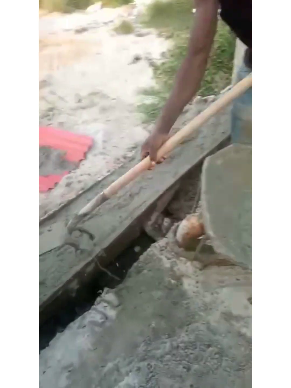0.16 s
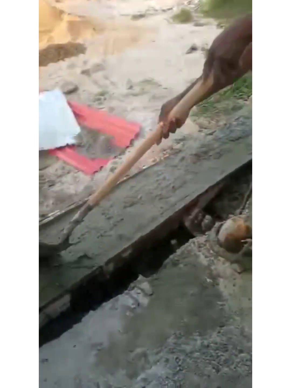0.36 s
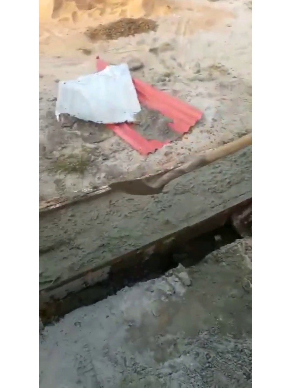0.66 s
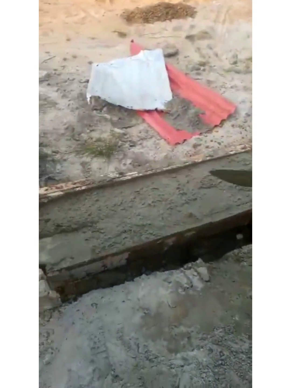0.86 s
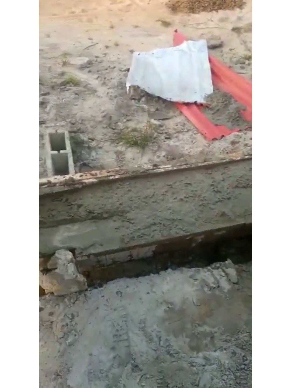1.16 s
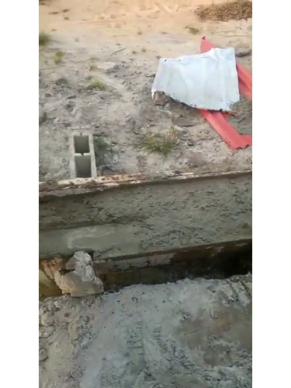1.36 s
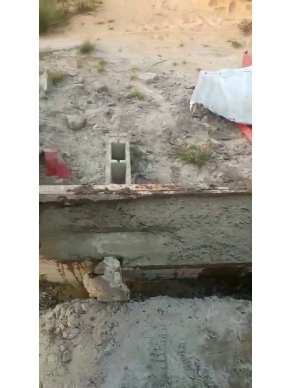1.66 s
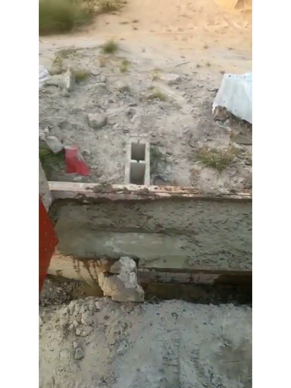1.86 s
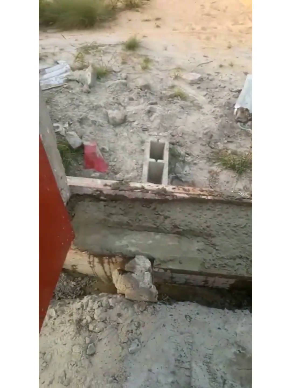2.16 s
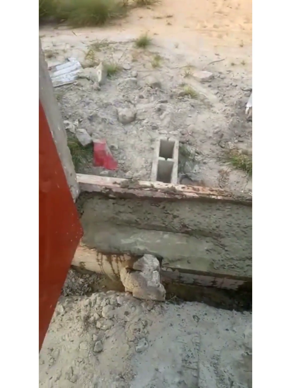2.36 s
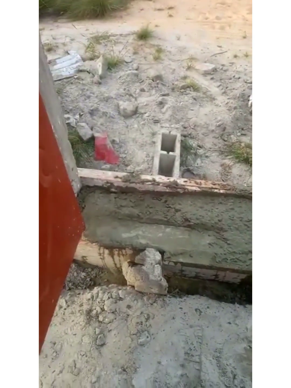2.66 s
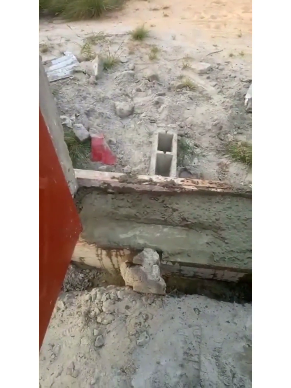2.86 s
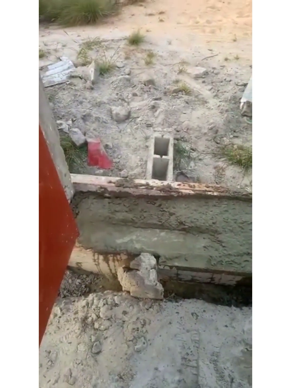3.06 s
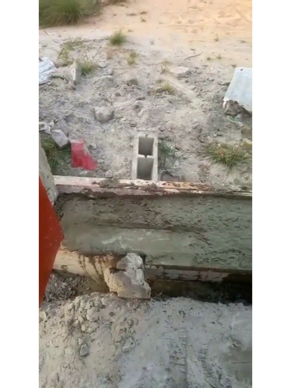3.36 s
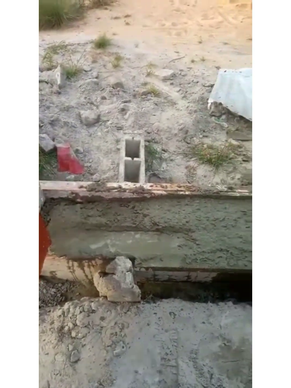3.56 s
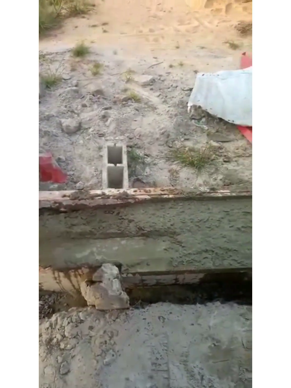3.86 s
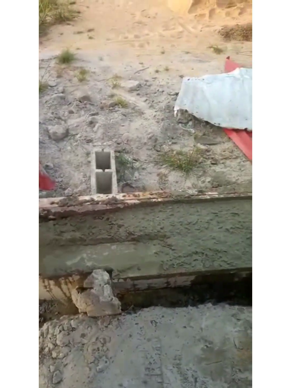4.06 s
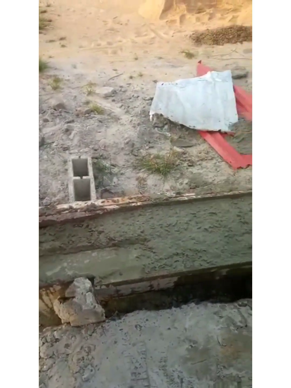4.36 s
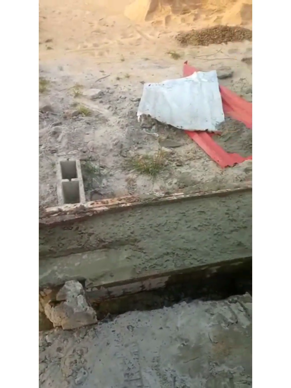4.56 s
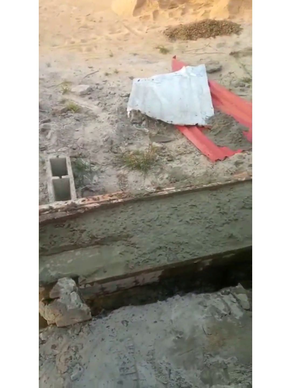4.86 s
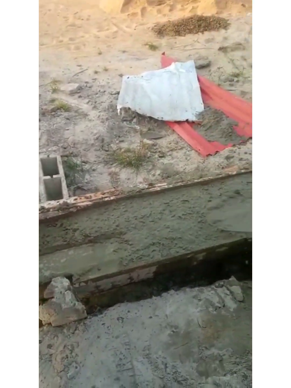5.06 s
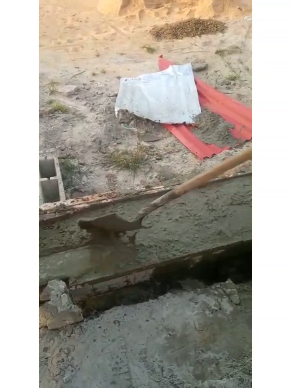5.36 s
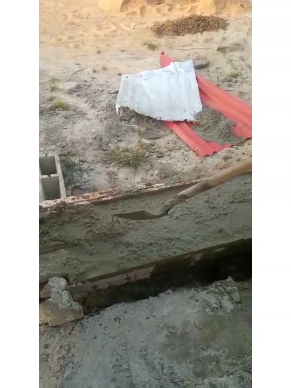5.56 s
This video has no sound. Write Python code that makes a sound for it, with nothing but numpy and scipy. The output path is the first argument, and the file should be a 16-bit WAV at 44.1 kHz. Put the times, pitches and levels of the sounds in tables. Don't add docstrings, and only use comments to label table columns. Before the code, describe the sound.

A short, crisp crush of wet grit on a slab fades to tiny ticks and soft hiss. Then a coarse, hollow metal scrape catches and slips in a wheelbarrow, followed by duller sliding, loose gravel and scattered stones. Near the end the shovel spreads concrete again. Open, dry building site, single phone microphone, faint wind buffeting.

```python
import sys
import numpy as np
from scipy import signal
from scipy.fft import rfft, irfft
from scipy.io import wavfile
from scipy.ndimage import uniform_filter1d, map_coordinates

SR = 44100
rng = np.random.default_rng(int(sys.argv[2]) if len(sys.argv) > 2 else 0)


def ratio_of_db(decibels):
    return 10 ** (np.asarray(decibels, float) / 20)


def store_wav(level_fs):
    pcm = np.round(np.clip(np.atleast_2d(level_fs), -1, 1) * 32767)
    wavfile.write(sys.argv[1], SR, pcm.T.astype(np.int16))


N = 252030

EDGES_HZ = (600, 2500, 8300)
# (frequency [Hz], density [dB per Hz])
WET_SPECTRUM = [(88, -69.5), (150, -18), (343, -6.5), (460, -12), (814, -2), (1210, -2.5), (1620, -5),
                (1860, -2.5), (2500, -6), (6550, -3), (9100, -25.5), (13300, -29.5), (15300, -17.5),
                (16500, -32)]
# (time [s], peak [dB], load [dB], t60 [s])
LUMPS = [(0.6543, -30, -9, 0.14), (0.8877, -55, -33, .035), (1.052, -37.5, -4.5, 0.28),
         (1.223, -50, -5, 0.072), (1.305, -50, -37.5, 0.076), (1.8527, -48, 2.5, 0.31),
         (1.908, -49.5, 1, 0.085), (4.6565, -34, -7, 0.094), (3.6503, -55, 17, 0.027),
         (3.696, -36, -5.5, 0.045), (3.9656, -41.5, -2, 0.08), (4.0, -68, 5, 0.11), (4.07, -59, 6.5, 0.1),
         (4.1331, -43, -9, 0.1), (4.3063, -38.5, 6.5, 0.039), (4.463, -53, 9, 0.11),
         (4.6932, -52, 9.5, 0.14)]


def along(points, hz):
    point_hz, values = np.transpose(points)
    return np.interp(np.log(hz + 1), np.log(point_hz + 1), values)


def curves(rows, fade_s=0.042):
    time_s, *columns = np.transpose(rows)
    t = np.arange(N) / SR
    corners_s = [time_s[0] - fade_s, time_s[0], time_s[-1], time_s[-1] + fade_s]
    gate_db = np.interp(t, corners_s, [-70, 0, 0, -70])
    return [np.interp(t, time_s, column) for column in columns], gate_db


def wobble(rate_hz):
    knots = rng.standard_normal(int(N * rate_hz / SR) + 4)
    return map_coordinates(knots, [np.arange(N) * rate_hz / SR])


def coloured(x, gain):
    size = 2 ** 13
    cepstrum = irfft(np.log(gain(np.fft.rfftfreq(size, 1 / SR)) + 1e-6))
    cepstrum[1:size // 2] *= 2
    cepstrum[size // 2 + 1:] = 0
    kernel = irfft(np.exp(rfft(cepstrum)))[:size // 2]
    return signal.fftconvolve(x, kernel / np.linalg.norm(kernel))[:N]


def sounded(forces, gain):
    def below(hz, edge_hz):
        return 1 / (1 + (hz / edge_hz) ** (6 + edge_hz / 500))

    low_hz, mid_hz, high_hz = EDGES_HZ
    parts = [lambda hz: below(hz, high_hz) - below(hz, mid_hz),
             lambda hz: below(hz, low_hz),
             lambda hz: below(hz, mid_hz) - below(hz, low_hz),
             lambda hz: 1 - below(hz, high_hz)]
    out = np.zeros(N)
    for force, part in zip(forces, parts):
        out += coloured(force, lambda hz: gain(hz) * np.sqrt(np.abs(part(hz))))
    return out


def grit(rate_hz, spread_db, life_s, smooth_db, lumps_db):
    sizes = np.minimum(rng.exponential(size=N), 3.5)
    starts = (rng.random(N) < rate_hz / SR) * ratio_of_db(2 * spread_db * sizes)
    grains = signal.lfilter([1], [1, -np.exp(-1 / (life_s * SR))], starts)
    power = grains / grains.mean() + ratio_of_db(2 * smooth_db)
    noise = rng.standard_normal((len(EDGES_HZ) + 1, N))
    force = np.sqrt(power) * ratio_of_db(lumps_db * wobble(80)) * noise
    return force / force.std()


def shared(effort_db, load_db, rule):
    thud_db, thud_per_load, fizz_db, fizz_per_effort, fizz_per_load = rule
    thud = effort_db + thud_db + thud_per_load * load_db
    rasp = effort_db + load_db
    fizz = fizz_db - 45 + fizz_per_effort * (effort_db + 45) + fizz_per_load * load_db
    return np.array([effort_db, thud, rasp, fizz])


def stroke(rows, rule, fade_s=0.2):
    controls, gate_db = curves(rows, fade_s)
    return ratio_of_db(2 * (shared(*controls, rule) + gate_db))


def swells(rows, trim_db, rule, rise_s):
    t = np.arange(SR // 3) / SR
    push = np.zeros((4, N + SR))
    for time_s, peak_db, load_db, t60_s in rows:
        rise = rise_s + 0.016 * t60_s
        swell = (1 - np.exp(-t / rise)) ** 2 * ratio_of_db(-120 * t / t60_s)
        power = ratio_of_db(2 * shared(peak_db + trim_db, load_db, rule))[:, None]
        push[:, round(time_s * SR):][:, :len(t)] += power * swell / swell.max()
    return push[:, :N]


def ringing(modes, floor, order=2):
    tops = [(mode_hz, db) for mode_hz, _, db in modes]

    def gain(hz):
        peaks = 0
        for mode_hz, width_hz, db in modes:
            response = hz * width_hz / (mode_hz ** 2 - hz ** 2 + 1j * hz * width_hz)
            peaks = peaks + ratio_of_db(db) * np.abs(response) ** order
        return floor + peaks / ratio_of_db(along(tops, hz))
    return gain


def patchy(x, depth_db, bins, frames):
    z = signal.stft(x, nperseg=512)[2]
    field = uniform_filter1d(rng.standard_normal(z.shape), bins, 0)
    field = uniform_filter1d(field, frames, 1)
    level_db = 10 * np.log10(np.sum(np.abs(z) ** 2, 0) + 1e-12)
    depth = depth_db * np.clip((-25.5 - level_db) / 30, 0.3, 1)
    gain = ratio_of_db(depth * field / field.std() - 0.115 * depth ** 2)
    return signal.istft(z * gain, nperseg=512)[1][:N]


def spreading():
    # (time [s], effort [dB], load [dB])
    strokes = [
        [(0.0, -52, 6.5), (0.06, -68.5, 4.5), (0.24, -61, -4.5)],
        [(0.25, -57, -10), (0.36, -54, -13), (0.395, -44, -3), (0.426, -33.5, -10.5), (0.57, -28.5, -4),
         (0.61, -40.5, -5.5), (0.71, -48.5, -2), (0.858, -62.5, -4.5), (0.9, -54, -20)],
        [(5.118, -73.5, 1), (5.256, -58, 0), (5.348, -53.5, -7), (5.41, -42, -4.5), (5.49, -27, -6.5),
         (5.588, -31.5, -2.5), (5.686, -50, -4), (5.715, -50.5, -3)],
    ]
    # (time [s], effort [dB], load [dB])
    settle = [(0.92, -62, -19.5), (1.036, -61.5, -14), (1.112, -71, 10.5), (1.17, -69.5, -1),
              (1.24, -67.5, -16.5), (1.4, -76.5, -16), (1.58, -84.5, -25.5), (1.836, -75, 0.5),
              (2.102, -85.5, 12)]
    # (frequency [Hz], gain [dB])
    thin_layer = [(1200, -2), (3000, -3.5), (6000, 0), (11000, -3.5)]
    site_db = [
        [-86.5],
        [-81],
        [-83.5],
        [-95],
    ]
    heaping = (3.4, 1.17, -20.5, 1.2, 1.5)
    on_slab = (-7.5, 2.5, -12, 0.7436, 0)
    settling = (-8, 1, -13, 1.4, -0.5)
    slumping = (-15.5, 6.5, -16.5, 1, -0.6)

    push = stroke(strokes[0], heaping) + stroke(strokes[1], on_slab) + stroke(strokes[2], on_slab)
    rest = stroke(settle, settling) + swells(LUMPS[:8], -16, slumping, rise_s=0.0011)
    rest += ratio_of_db(2 * np.array(site_db))
    force = grit(600, spread_db=1.0, life_s=0.00056, smooth_db=0.5, lumps_db=0.6)
    pushed = sounded(np.sqrt(push) * force, lambda hz: ratio_of_db(along(WET_SPECTRUM, hz)))
    settled = sounded(np.sqrt(rest) * force[:, ::-1],
                      lambda hz: ratio_of_db(along(WET_SPECTRUM, hz) + along(thin_layer, hz)))
    return patchy(pushed + settled, 3.6, bins=2, frames=8)


def wind():
    # (time [s], strength [dB])
    gust_levels = [(0.0, -57), (0.83, -64.5), (1.06, -57.5), (1.72, -67), (1.91, -59), (2.07, -56),
                   (2.4, -60), (2.77, -51.5), (3.15, -57.5), (3.62, -58), (4.18, -62), (4.42, -66),
                   (4.6, -55.5), (5.06, -64), (5.3, -62), (5.5, -55), (5.6, -54.5), (5.71, -64)]
    # (frequency [Hz], density [dB per Hz])
    rumble_spectrum = [(15, -64), (25, -27), (65, -9.5), (86, -5.5), (168, -10), (227, -28.5), (300, -40.5),
                       (390, -66), (660, -120)]
    lumps_db = 2.5 * wobble(7) + 1.5 * wobble(18)
    gusts = ratio_of_db(curves(gust_levels)[0][0] + lumps_db)
    rumble = coloured(rng.standard_normal(N), lambda hz: ratio_of_db(along(rumble_spectrum, hz)))
    return patchy(gusts * rumble, 4, bins=1, frames=14)


def landings(rows, spectrum, rule):
    t = np.arange(SR // 8) / SR
    forces, rings = np.zeros((4, N + SR)), np.zeros(N + SR)
    lasts = np.array([[1], [1.8], [1.3], [1.15]])
    rise_s = np.array([[0.0002], [0.003], [0.001], [0.0002]])
    crack_share = [[1], [0], [0.5], [1]]
    blow_share = np.array([0.46, 0.26, 0.45, 1])
    for time_s, peak_db, weight_db, stone_hz, sharp_db in rows:
        at, draw = round(time_s * SR), rng.standard_normal((5, len(t)))
        t60_s = max(0.061 + 0.00075 * weight_db, 0.02)
        splash = (1 - np.exp(-t / rise_s)) * ratio_of_db(-60 * t / (t60_s * lasts)) * draw[:4]
        splash += 2.05 * ratio_of_db(-60 * t / 0.0065) * draw[:4] * crack_share
        splash[:, 0] += 9 * np.sign(draw[4, 4]) * blow_share
        levels_db = shared(peak_db - 19.0, weight_db + 2.0, rule) + [0, 0, 0, sharp_db]
        forces[:, at:at + len(t)] += ratio_of_db(levels_db)[:, None] * splash

        pitches_hz = stone_hz * np.exp(np.array([0, 0.3]) * draw[4, 1:3])[:, None]
        tones = np.sin(2 * np.pi * np.minimum(pitches_hz, 7200) * t)
        rings[at:at + len(t)] += ratio_of_db(peak_db - 13.0 - 60 * t / (0.7 * t60_s)) * (tones.T @ [0.8, 0.3])
    return sounded(forces[:, :N], lambda hz: ratio_of_db(along(spectrum, hz))) + rings[:N]


def falling_stones():
    # (time [s], peak [dB], weight [dB], stone [Hz])
    crumb_rows = [(0.134, -35.5, -13, 1780), (0.1815, -43, -10, 6750), (0.2663, -33.5, -18, 6400),
                  (0.301, -34.5, -13, 796), (0.4256, -23, 10, 1510), (0.4775, -13, -0.5, 5840),
                  (0.5172, -19, 8, 2930), (0.5418, -18.5, 0, 7200), (0.5902, -18, 1.5, 874),
                  (0.664, -25.5, -6, 6650), (0.7169, -22, -5.5, 2950), (0.7494, -32.5, -3.5, 6100),
                  (0.7881, -39, -5.5, 5380), (0.775, -51, -25, 6250), (0.864, -42, -23, 6890),
                  (0.888, -50, -22, 3170), (0.964, -38, -25, 6530), (1.356, -53, -25, 6340),
                  (1.383, -55, -30.5, 7330), (1.457, -58, -18.5, 6460), (1.596, -53.5, -36.5, 5400),
                  (5.1167, -47, -8, 7030), (5.1692, -36.5, -56, 6400), (5.216, -36, -4, 6500),
                  (5.243, -41, -30, 780), (5.374, -26, 0.5, 6330), (5.4806, -19.5, 2.5, 6180),
                  (5.506, -11, -15, 6480), (5.5435, -12.5, -12, 4460), (5.4365, -23, -18, 6660),
                  (5.517, -11, -15, 4160), (5.6003, -17, -22, 6050), (5.6607, -26, -3, 4160)]
    # (time [s], peak [dB])
    sparks = [(0.429, -30.5), (0.471, -26.5), (0.6637, -31.5), (4.481, -54), (4.661, -37), (4.799, -53),
              (4.8365, -57), (4.896, -53.5), (4.952, -54), (4.966, -56.5), (4.976, -54.5), (5.027, -72),
              (5.046, -60), (5.054, -50.5), (5.123, -43), (5.424, -30.5), (5.648, -33)]
    # (time [s], peak [dB], weight [dB])
    ticks = [(3.061, -31, -19), (3.2539, -33.5, 3), (3.3137, -39, -20), (3.814, -47, -25),
             (3.197, -42, -13), (3.469, -41, -25), (2.557, -20.5, -3), (2.745, -24.5, -5),
             (4.005, -47, -35), (4.021, -48, -29), (4.141, -31.5, -4.5), (4.389, -40.5, -8),
             (4.446, -44, -28), (4.475, -38, -8), (4.492, -47, -17.5), (5.405, -29.5, -31),
             (5.1525, -46, -16), (5.2965, -36.5, -7), (5.693, -29, -25), (5.698, -28.5, -13),
             (5.1893, -43, -18)]
    # (time [s], peak [dB], weight [dB], stone [Hz], sharpness [dB])
    first_run = [(3.1898, -29, 1, 1890, -40), (3.3453, -32, -3, 3300, -24), (3.436, -34, -10, 4060, -44),
                 (3.475, -35.5, -27, 1850, -46.5), (3.5231, -23, 2.5, 4800, -42),
                 (3.5241, -20, 2.5, 3670, -53), (3.5894, -19.5, -1, 1696, -32),
                 (3.6217, -36, -24, 4670, -20), (3.7366, -29, -10.5, 1860, -22),
                 (3.783, -26.5, -12.5, 3320, -34), (3.8387, -38, -3.5, 4560, -36),
                 (3.8736, -44, -28, 4470, -12), (3.9424, -42, -4, 5600, -30),
                 (3.9545, -41.5, -10, 3650, -32)]
    # (time [s], peak [dB], weight [dB], stone [Hz], sharpness [dB])
    second_run = [(4.045, -43, -24, 5800, -24), (4.0807, -43, -27, 4660, -26),
                  (4.2502, -23, -14, 3540, -28.5), (4.2848, -23.5, -4.5, 3800, -25),
                  (4.324, -29.5, -8.5, 4630, -21), (4.361, -21.5, -32, 5720, -26),
                  (4.4532, -28.5, -17, 2000, -25), (4.481, -39.5, -2, 4740, -16.5),
                  (4.503, -29.5, -24, 4530, -25), (4.5138, -19.5, -9.5, 3240, -27),
                  (4.518, -18.5, -20, 4820, -40), (4.5502, -38, -3, 5000, -15),
                  (4.578, -31, -43, 5330, -16), (4.74, -49, -18, 4130, -25),
                  (4.855, -49, -30.5, 5040, -26.5)]
    # (time [s], effort [dB], load [dB])
    trickle = [(3.5, -62.5, -1), (3.6, -60, -1), (3.9, -69.5, -10), (4.08, -70, 0), (4.31, -70.5, -9),
               (4.55, -71.5, 3.5), (4.75, -79, -8), (5.1, -78, 3.5)]
    # (frequency [Hz], density [dB per Hz])
    gravel_spectrum = [(88, -27.5), (150, -10), (281, -6), (386, 1), (656, -6), (1310, -11.5), (1790, -6.5),
                       (2500, -15), (4690, -7), (6420, -6.5), (7510, -10), (8620, -27.5), (13000, -38),
                       (15300, -25.5), (16500, -35.5)]
    # (frequency [Hz], width [Hz], gain [dB])
    hollow_modes = [(373.6, 26, -3.5), (599, 20, -14), (791, 56, -8), (1090, 45, -13), (1750, 200, -8),
                    (3200, 170, -18), (3660, 92, -10), (4970, 890, -5.5)]
    loose = (-0.5, 1, -15.5, 1, -1)
    thumping = (-2, 1.13, -23, 0, 0.17)
    dropping = (-4, 0.5, 12.5, 1.47, 0.02)
    crumbling = (-11, 0.96, 10, 1.28, -0.15)

    push = stroke(trickle, loose) + swells(LUMPS[8:], -15.5, thumping, rise_s=0.0012)
    force = grit(310, spread_db=4.5, life_s=0.00069, smooth_db=-0.5, lumps_db=2.0)
    ring = ringing(hollow_modes, ratio_of_db(-3))
    shifting = sounded(np.sqrt(push) * force, lambda hz: ratio_of_db(along(gravel_spectrum, hz)) * ring(hz))

    crumbs = [(*row, -23) for row in crumb_rows]
    small = [(time_s, db, weight_db, 6200, -25) for time_s, db, weight_db in ticks]
    small += [(time_s, db, -20, 6800, -3.5) for time_s, db in sparks]
    drops = landings(first_run + second_run + small, gravel_spectrum, dropping)
    drops = drops + landings(crumbs, WET_SPECTRUM, crumbling)
    return patchy(shifting, 3.5, bins=3, frames=12) + patchy(drops, 2.5, bins=4, frames=6)


def booms():
    # (time [s], peak [dB], panel [Hz], length [s])
    boom_rows = [(2.143, -30, 635, 0.028), (2.146, -29.5, 1038, 0.013), (2.193, -33, 690, 0.016),
                 (2.195, -34, 350, 0.04), (2.27, -27.5, 437, 0.021), (2.318, -30, 366, 0.013),
                 (2.352, -35, 1110, 0.012), (2.383, -37, 364, 0.027), (2.422, -25.5, 363, 0.017),
                 (2.448, -28, 770, 0.017), (2.442, -32.5, 314, 0.059), (2.494, -26.5, 368, 0.02),
                 (2.515, -26, 672, 0.012), (2.554, -29.5, 764, 0.026), (2.605, -23.5, 388, 0.021),
                 (2.598, -32, 239, 0.025), (2.691, -31, 467, 0.0097), (2.745, -26.5, 443, 0.014),
                 (2.751, -32, 443, 0.014), (3.961, -57.5, 407, 0.029), (3.964, -53, 666, 0.0071),
                 (3.738, -59.5, 770, 0.015), (3.694, -60.5, 1750, 0.015), (3.845, -68, 1760, 0.023),
                 (4.256, -57, 960, 0.016), (4.281, -47, 1650, 0.0094), (4.328, -50.5, 1790, 0.0077),
                 (4.569, -63, 1130, .015), (4.726, -69, 597, 0.038), (0.422, -43, 271, 0.015),
                 (0.471, -36.5, 1050, 0.011), (0.532, -35, 1210, 0.016), (0.584, -34, 810, 0.012),
                 (0.715, -36.5, 2420, 0.008), (4.286, -54, 396, 0.026), (4.305, -47, 440, 0.011),
                 (4.46, -50, 395, 0.014), (5.232, -51.5, 867, 0.0085), (5.25, -49, 880, 0.0082),
                 (5.267, -53, 760, 0.016), (5.298, -63, 965, 0.017), (5.33, -61, 620, 0.039),
                 (5.445, -36.5, 714, 0.0094), (5.511, -35.5, 310, 0.01), (5.544, -25.5, 1153, 0.0065),
                 (5.554, -26, 1255, 0.0095)]
    out = np.zeros(N + SR)
    draws = rng.standard_normal((len(boom_rows), 2))
    for (time_s, peak_db, panel_hz, length_s), (drift, phase) in zip(boom_rows, draws):
        u = np.linspace(0, 1, int(1.3 * length_s * SR) + 2)
        turn = 2 * np.pi * np.cumsum(panel_hz * (1 + 0.025 * drift * (u - 0.5))) / SR
        swell = np.sin(np.pi * u ** 0.67)
        out[round(time_s * SR):][:len(u)] += ratio_of_db(peak_db) * swell * np.sin(turn + 2 * phase)
    rattle_db = 3.5 * wobble(220)
    return out[:N] * ratio_of_db(rattle_db)


def clinks():
    # (time [s], peak [dB], pitch [Hz], length [s])
    clink_rows = [(0.568, -33, 6480, 0.0048), (0.786, -44, 5300, .006), (0.888, -56, 3240, 0.013),
                  (1.05, -52.5, 6170, 0.02), (1.303, -62.5, 6500, 0.03), (1.382, -53.5, 6700, 0.0043),
                  (2.559, -37, 1700, 0.013), (2.6, -38, 3530, .012), (2.6, -34.5, 1142, 0.017),
                  (2.875, -46, 1145, .02), (2.923, -55, 1964, .02), (3.018, -39.5, 800, 0.011),
                  (3.107, -43, 795, 0.013), (3.165, -55, 440, 0.01), (3.254, -43.5, 3870, 0.009),
                  (3.702, -52, 6500, 0.0055), (3.784, -47, 4300, 0.0074), (3.966, -55.5, 3270, 0.0085),
                  (3.968, -50, 478, 0.01), (4.141, -44.5, 4650, 0.0065), (4.142, -60, 1900, 0.0097),
                  (4.308, -54, 2000, 0.0057), (4.658, -44.5, 4600, 0.0068), (4.662, -62, 1830, 0.01),
                  (4.693, -51.5, 1030, 0.0057), (5.053, -70, 1816, 0.037), (5.145, -64.5, 1750, 0.01),
                  (5.194, -59, 900, .012), (5.217, -50, 4530, 0.0051), (5.294, -51, 4580, 0.0054),
                  (5.402, -40, 3760, 0.0084), (5.659, -34, 3860, 0.0036)]
    # (time [s], peak [dB], stone [Hz])
    dust = [(1.1962, -57, 6060), (1.2281, -54, 6420), (1.2745, -58, 5690), (1.3194, -51, 6670),
            (1.4094, -66, 6900), (1.4854, -63, 4930), (1.6157, -60.5, 5340), (1.6482, -59.5, 6560),
            (1.7294, -69, 5660), (1.7868, -64, 5700), (1.8346, -57, 6160), (1.873, -51, 6450),
            (1.8981, -53, 6300), (1.969, -66, 6180), (2.0018, -62, 5900)]
    spread = 0.09
    out = np.zeros(N + SR)
    rows = clink_rows + [(time_s, db - 8, hz, 0.0065) for time_s, db, hz in dust]
    draws = rng.standard_normal((len(rows), 2, 9, 1))
    for (time_s, peak_db, pitch_hz, length_s), (detune, phase) in zip(rows, draws):
        u = np.linspace(0, 1, int(1.6 * length_s * SR) + 2)
        turn = 2 * np.pi * pitch_hz * np.exp(spread * detune) * np.arange(len(u)) / SR
        cluster = np.sin(turn + 2 * phase).sum(0)
        out[round(time_s * SR):][:len(u)] += ratio_of_db(peak_db - 8.5) * np.sin(np.pi * u ** 0.55) * cluster
    return out[:N]


def scraping():
    # (time [s], effort [dB], load [dB])
    drag_rows = [(2.12, -62.5, -5), (2.184, -48.5, 6), (2.31, -36, 1.5), (2.428, -39, 3.5),
                 (2.62, -42, 1.5), (2.64, -51, 7), (2.692, -44.5, 3), (2.775, -52, 9)]
    # (time [s], peak [dB], load [dB], t60 [s])
    slips = [(2.1234, -42, 2.5, .12), (2.1335, -34.5, 3, 0.085), (2.144, -18.5, -5.5, 0.054),
             (2.174, -29, -3, 0.082), (2.185, -25.5, 2.5, 0.073), (2.1972, -38.5, 16, 0.054),
             (2.2259, -24.5, 0, 0.21), (2.2623, -26, 1, 0.053), (2.2714, -25, 3.5, 0.047),
             (2.311, -42, 19.5, 0.074), (2.3494, -35, 13, 0.035), (2.3844, -40.5, -6, 0.045),
             (2.424, -36, 13, 0.15), (2.4502, -36, 12, 0.3), (2.4943, -30, 3.5, 0.13),
             (2.5556, -27.5, 2, 0.12), (2.599, -27.5, 7, 0.08), (2.6898, -32.5, 10, 0.029),
             (2.7432, -35.5, -5, 0.19)]
    # (frequency [Hz], density [dB per Hz])
    steel_spectrum = [(71, -37.5), (120, -10), (380, 0.5), (551, -6.5), (766, -1), (885, -10.5),
                      (1230, -18), (1860, -15.5), (4510, -26.5), (6530, -22), (8890, -38), (13400, -42),
                      (15200, -31), (16500, -35.5)]
    # (frequency [Hz], width [Hz], gain [dB])
    tub_modes = [(417, 73, -4.5), (749, 24, 4.5), (1066, 62, -24), (1890, 21, -14.5), (2510, 86, 8.5),
                 (2610, 12, 2), (3480, 470, -14)]
    # (time [s], effort [dB], load [dB])
    back = [(2.795, -49, 4), (2.857, -54, 5.5), (3.053, -56, 8), (3.203, -50, -0.5), (3.343, -54.5, -0.5),
            (3.5, -61.5, -4)]
    # (frequency [Hz], density [dB per Hz])
    slide_spectrum = [(88, -47.5), (150, -4.5), (434, 4.5), (571, -6), (1050, -7), (1280, -10), (1860, -12),
                      (5070, -20.5), (6420, -14), (9500, -44), (13300, -49.5), (15300, -39.5), (16500, -61)]
    # (frequency [Hz], width [Hz], gain [dB])
    loaded_modes = [(416, 69, -1), (815, 120, -2.5), (1060, 41.6, -3), (1860, 170, -10), (2550, 37, -12.5)]
    on_tub = (-1, 1.76, -20.5, 1.2, 1.5)
    catching = (-2.5, 0.703, -9.5, 0.85, 0)
    sliding = (-3.5, 1.07, -22, 1, 0)

    push = stroke(drag_rows, on_tub, fade_s=0.14) + swells(slips, -8.5, catching, rise_s=0.0029)
    coarse = grit(790, spread_db=5.0, life_s=0.00076, smooth_db=5.5, lumps_db=1.5)
    ring = ringing(tub_modes, 1.06, order=1)
    drag = sounded(np.sqrt(push) * coarse, lambda hz: ratio_of_db(along(steel_spectrum, hz)) * ring(hz))

    slip_back = stroke(back, sliding, fade_s=0.017)
    fine = grit(900, spread_db=2.0, life_s=0.00066, smooth_db=1.5, lumps_db=1.0)
    dull_ring = ringing(loaded_modes, ratio_of_db(3))
    slide = sounded(np.sqrt(slip_back) * fine, lambda hz: ratio_of_db(along(slide_spectrum, hz)) * dull_ring(hz))
    return patchy(drag, 4, bins=2, frames=4) + patchy(slide, 2.5, bins=3, frames=4)


def scene():
    return (spreading() + wind() + falling_stones() + booms() + clinks() + scraping())[None]


def low_pass(x):
    return signal.sosfilt(signal.butter(12, 17000, fs=SR, output="sos"), x)


def record(dry):
    port_hz, port_width_hz, port_db = 6750, 1090, 3.83
    bass_cut_hz, top_hz = 35, 15850
    hz = np.fft.rfftfreq(N, 1 / SR)
    port = ratio_of_db(port_db / (1 + (2 * (hz - port_hz) / port_width_hz) ** 2))
    bass_cut = hz ** 3 / (hz ** 3 + bass_cut_hz ** 3)
    top = ratio_of_db(-31.5 / (1 + np.exp(np.clip((top_hz - hz) / 25, -50, 50))))
    mix = irfft(rfft(dry) * port * bass_cut * top, N)
    return low_pass(mix)


dry = scene()
out = record(dry)
store_wav(out)
```